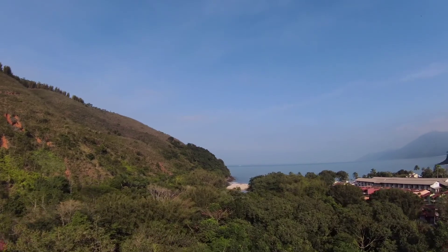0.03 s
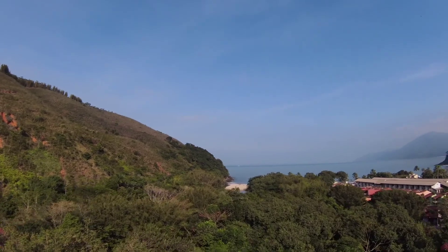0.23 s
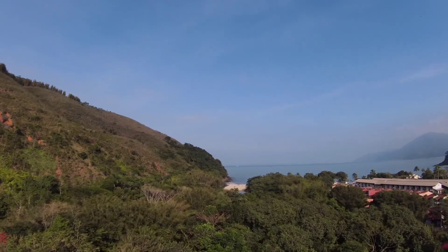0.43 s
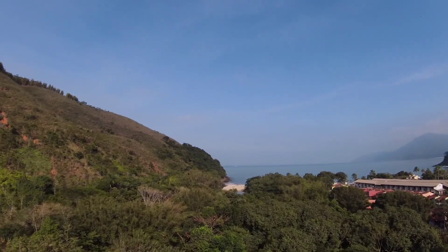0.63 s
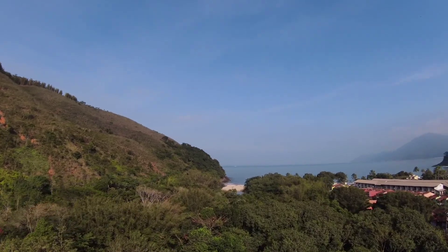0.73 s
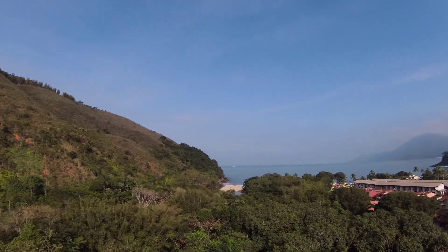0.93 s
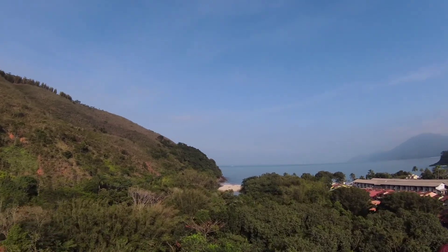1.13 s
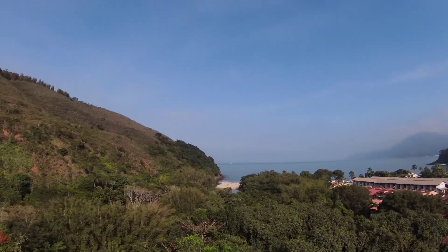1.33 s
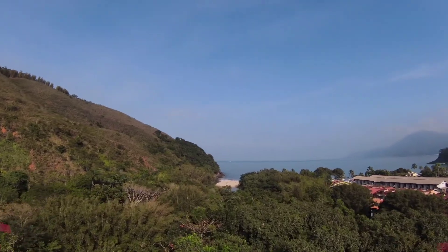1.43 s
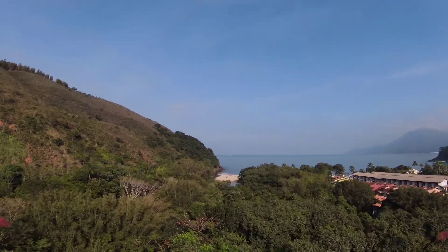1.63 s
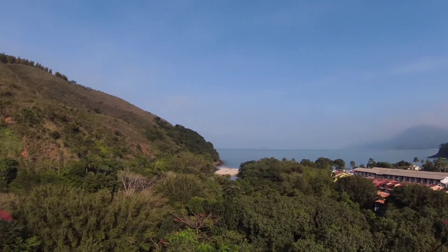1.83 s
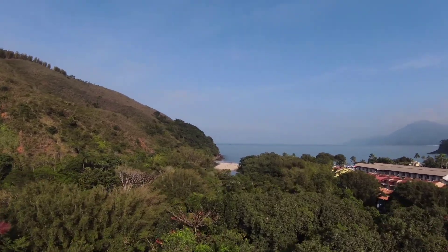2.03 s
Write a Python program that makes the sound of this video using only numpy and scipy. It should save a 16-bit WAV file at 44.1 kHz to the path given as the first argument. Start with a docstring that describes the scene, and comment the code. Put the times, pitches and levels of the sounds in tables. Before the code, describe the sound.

A small quadcopter drone flies outdoors, heard from on board: four propellers buzz continuously at slightly different pitches, beating together, with thin motor whine, rushing prop wash and low wind that grows slightly.

```python
"""Small quadcopter, heard from on board

Four three-blade propellers turn at slightly different speeds and beat: harmonics of each blade rate,
plus sum tones where rear blades cut the front wake. Motors whine at the magnet and coil-switching rates.
Prop wash is noise chopped at the blade rates, cut steeply near 3.9 kHz by the camera;
wind is low noise; the frame rings as gusty narrow-band noise."""
import sys
import numpy as np
from scipy import signal
from scipy.fft import rfft, irfft
from scipy.io import wavfile

SR = 44100
rng = np.random.default_rng(int(sys.argv[2]) if len(sys.argv) > 2 else 0)


def master_out(mix):
    """Clip the mix to full scale and print it as 16-bit PCM to the path in sys.argv[1]."""
    frames = np.transpose(np.atleast_2d(mix))
    ceiling = np.clip(frames, -1, 1)
    pcm = np.round(ceiling * 32767).astype(np.int16)
    wavfile.write(sys.argv[1], SR, pcm)


N = 92080

# Blade passing rate of each propeller: (time [s], rate [Hz])
FRONT_LEFT_HZ = [(0.0, 418.8), (0.15, 427.9), (0.35, 418), (0.55, 422.5), (0.7, 404.8), (0.77, 407.8),
                 (0.84, 410.2), (0.9, 416), (0.94, 414.7), (1.02, 409.3), (1.14, 411.6), (1.34, 408.6),
                 (1.42, 400.4), (1.58, 393.9), (1.69, 398), (1.8, 384.7), (1.96, 388.2), (2.08, 391)]
FRONT_RIGHT_HZ = [(0.0, 420.5), (0.23, 426), (0.492, 415.3), (0.598, 419.9), (0.708, 405.4), (0.89, 414.3),
                  (0.958, 411.9), (1.072, 405.8), (1.15, 405.6), (1.212, 405.1), (1.518, 403.7),
                  (2.08, 420.8)]
REAR_RIGHT_HZ = [(0, 532.7), (0.168, 537.8), (.62, 521.9), (.7, 518), (.83, 523), (0.949, 526),
                 (1.059, 517.6), (1.25, 517.2), (1.351, 517), (1.498, 511), (1.6, 504.4), (1.7, 511),
                 (1.799, 510), (1.9, 508), (2, 509.2), (2.08, 530)]
REAR_LEFT_HZ = [(0.0, 536.6), (0.21, 541.6), (0.498, 531.2), (0.61, 535.3), (0.712, 525), (0.78, 525),
                (0.901, 534.4), (1.399, 527.2), (1.5, 515), (1.868, 517.4), (1.99, 526), (2.08, 523.7)]
# Blade tones, rows front left, front right, rear right, rear left: (level of harmonics 1 to 6 [dB])
BLADE_DB = [(-44, -45.5, -47, -62.5, -64, -68), (-51.5, -54.5, -58, -62, -61.5, -57),
            (-53, -56, -68.5, -59.5, -67.5, -78), (-54, -48.5, -60.5, -69, -70.5, -76)]
# Placement and steadiness, same rows: (L-R [dB], lead at left microphone [ms], speed hunting [share])
ROTORS = [(-1, -.02, 0.003009), (-3.5, -0.24, .003), (-6, -0.26, .003), (4, 0.12, 0.0032)]
# Magnet whine of each motor, same rows: (level [dB], L-R [dB])
MAGNET_WHINE = [(-57.5, 7), (-60.5, 5.5), (-51.5, -9), (-53, -8)]
# Rear blades cutting the front wake: (front multiple [-], rear multiple [-])
WAKE_ORDERS = [(1, 1), (2, 1), (1, 2), (3, 2), (2, 4)]
# The same wake tones: (level [dB], L-R [dB])
WAKE_LEVELS = [(-51, 3), (-60, -6.5), (-60, 12), (-58, -2), (-59.5, -6)]
# Motor bell resonances: (centre [Hz], width [Hz], relative gain [dB])
BELL = [(5755, 170, -4), (7040, 47, 5.5)]
# Prop wash as the camera passes it, steep cut near 3.9 kHz, faint hiss above:
# (frequency [Hz], relative gain [dB])
WASH_AT_CAMERA = [(20, -30.5), (200, -4.5), (350, 0.5), (650, -0.5), (1000, 8), (1300, 4), (1700, 3),
                  (2050, 7), (2400, 6), (2700, -2), (3100, -3.5), (3500, -8), (3900, -21), (4300, -48),
                  (5000, -40.5), (6500, -28), (9000, -37), (15000, -34)]
# Wind spectrum: (frequency [Hz], relative level [dB])
WIND_SPECTRUM = [(12, -26), (28, -5), (48, -1.5), (80, -2.5), (135, -2.5), (200, -5.5), (300, -9),
                 (600, -19.5), (2000, -71.5)]

BLADES, POLES, COMMUTATIONS = 3, 14, 42  # per revolution
HUNT_PER_S = 39.36  # speed corrections
# Rough air on a tone at 1 kHz; higher tones feel more
FLUTTER_DB, FLUTTER_PER_S, ROUGH_SHARE = 2.0, 38, 0.12
EDDIES_PER_S = 140
LOAD_DB_PER_PERCENT = 0.39  # level per percent of speed, for a tone at 1 kHz
PORTS_APART_HZ = 1700  # above this the two microphones hear different sound
APART_RAD = 1.11  # phase offset of high tones at each microphone
MOTOR_EXPOSURE = 0.26  # motors feel rough air less than blades
SWITCH_DB, SWITCH_JITTER_RAD, SWITCH_JITTERS_PER_S = -92, 0.6, 160
WASH_DB, WASH_RISE_DB_PER_S = -42, 1.17  # levels with a rise hold at mid-scene
WASH_SIDE, WASH_CHOP_PER_ROTOR = 0.37, 0.165  # SIDE: stereo width in the bass, 0 to 1
WASH_SUCTION = 0.07  # eddies dip the pressure more than they raise it
WIND_DB, WIND_RISE_DB_PER_S, WIND_SIDE = -48, 1.5, 0.34
FRAME_HZ, FRAME_HALF_WIDTH_HZ, FRAME_SIDE = 1490, 44, 0.18
FRAME_DB, FRAME_RISE_DB_PER_S = -52.5, 3
FRAME_GUST_DB, FRAME_GUSTS_PER_S = 2, 11
TOP_HZ = 15500


def undb(db):
    """Decibels to amplitude gain."""
    return 10 ** (np.asarray(db) / 20)


def unit(x):
    """Scale to rms 1."""
    return x / np.sqrt(np.mean(x ** 2))


def walk(rate_per_s):
    """Smooth random motion, about rate_per_s turns a second, spread 1."""
    size = N // 32
    f_hz = np.fft.rfftfreq(size, N / size / SR)
    lowpass = 1 / (1 + (2 * f_hz / rate_per_s) ** 4)
    slow = unit(irfft(rfft(rng.standard_normal(size)) * lowpass, size))
    return signal.resample_poly(slow, 33, 1, window=("kaiser", 12))[:N]  # 33: enough to cover N


def air(colour, side):
    """Coloured stereo noise: partly shared by both sides in the bass, unrelated in the treble."""
    f_hz = np.fft.rfftfreq(N, 1 / SR)
    mid, difference = rfft(rng.standard_normal((2, N)))
    width = side + (1 - side) / (1 + (PORTS_APART_HZ / (f_hz + 1)) ** 8)
    signs = np.array([[1], [-1]])
    stereo = (mid + signs * width * difference) / np.sqrt(1 + width ** 2)
    return unit(irfft(colour(f_hz) * stereo, N))


def shape(points):
    """Gain against frequency, interpolated in dB over log frequency."""
    hz, db = np.array(points).T
    return lambda f_hz: undb(np.interp(np.log(f_hz + 1), np.log(hz), db))


def eddy():
    """Complex random motion: disturbs amplitude and phase of a tone."""
    return walk(EDDIES_PER_S) + 1j * walk(EDDIES_PER_S)


def tone(phase, db, pan_db=0, lead_ms=0, exposure=1):
    """One rotor line: level follows speed, rough air flutters it, high lines differ between microphones."""
    speed_hz = np.gradient(phase) * SR / (2 * np.pi)
    mean_hz = speed_hz.mean()
    exposed = exposure * 2 * mean_hz / (mean_hz + 1000)
    half_lead_rad = np.pi * mean_hz * lead_ms / 1000
    load_db = LOAD_DB_PER_PERCENT * exposed * (speed_hz / mean_hz - 1) * 100
    apart = 1 / (1 + (PORTS_APART_HZ / mean_hz) ** 4)
    shared_gust, shared_eddy = walk(FLUTTER_PER_S), eddy()
    out = []
    for side in (1, -1):  # left, right
        flutter = np.sqrt(1 - apart) * shared_gust + np.sqrt(apart) * walk(FLUTTER_PER_S)
        grain = 1 + ROUGH_SHARE * exposed * (shared_eddy + eddy()) / np.sqrt(2)
        side_phase = phase + side * (half_lead_rad + apart * APART_RAD)
        line = -np.real(grain * np.exp(1j * side_phase))  # minus: harmonics dip together
        moving = unit(undb(FLUTTER_DB * exposed * flutter + load_db) * line)
        out.append(moving * undb(db + side * pan_db / 2))
    return np.array(out)


def spin(curve, hunt_share, t):
    """Blade phase of one propeller: speed curve plus the flight controller's small corrections."""
    hz = np.interp(t, *np.array(curve).T) * (1 + hunt_share * walk(HUNT_PER_S))
    return 2 * np.pi * (rng.random() + np.cumsum(hz) / SR)


def propellers(phases):
    """Blade tones: harmonics of each blade passing rate."""
    out = np.zeros((2, N))
    for phase, levels_db, (pan_db, lead_ms, _) in zip(phases, BLADE_DB, ROTORS):
        for harmonic, db in enumerate(levels_db, 1):
            out += tone(harmonic * phase, db, pan_db, lead_ms)
    return out


def wake_cutting(phases):
    """Rear-left blades cut the front-right wake: sum tones of multiples of both blade rates."""
    _, front_right, _, rear_left = phases
    return sum(tone(front * front_right + rear * rear_left, db, pan_db)
               for (front, rear), (db, pan_db) in zip(WAKE_ORDERS, WAKE_LEVELS))


def magnet_whine(phases):
    """Magnets passing the stator: one tone per motor at the pole rate."""
    return sum(tone(phase * POLES / BLADES, db, pan_db, exposure=MOTOR_EXPOSURE)
               for phase, (db, pan_db) in zip(phases, MAGNET_WHINE))


def coil_switching(phases):
    """Faint uneven switching tones, swelling where they meet a motor bell resonance; mono."""
    switching = sum(np.cos(phase * COMMUTATIONS / BLADES + SWITCH_JITTER_RAD * walk(SWITCH_JITTERS_PER_S))
                    for phase in phases)
    f_hz = np.fft.rfftfreq(N, 1 / SR)
    bell = sum(undb(db) / (1 + 2j * (f_hz - hz) / width_hz) for hz, width_hz, db in BELL)
    return undb(SWITCH_DB) * unit(irfft(rfft(switching) * bell, N))


def wash(phases, late_s):
    """Turbulent air off the blades: noise pulsing at each blade rate, slowly thickening, cut by the camera."""
    chop = 1 + WASH_CHOP_PER_ROTOR * sum(np.cos(phase) for phase in phases)
    rush = air(lambda f_hz: f_hz / (f_hz + 100) / (1 + (f_hz / 3000) ** 2), WASH_SIDE) * chop
    rush = rush - WASH_SUCTION * (rush ** 2 - np.mean(rush ** 2))
    gain = shape(WASH_AT_CAMERA)(np.fft.rfftfreq(N, 1 / SR))
    return unit(irfft(rfft(rush) * gain, N)) * undb(WASH_DB + WASH_RISE_DB_PER_S * late_s)


def wind(late_s):
    """Wind rumble on the camera: low coloured noise, slowly growing."""
    return air(shape(WIND_SPECTRUM), WIND_SIDE) * undb(WIND_DB + WIND_RISE_DB_PER_S * late_s)


def frame_ring(late_s):
    """Wind shaking a frame resonance: narrow-band noise in gusts, slowly growing."""
    ring = air(lambda f_hz: 1 / (1 + ((f_hz - FRAME_HZ) / FRAME_HALF_WIDTH_HZ) ** 2), FRAME_SIDE)
    gusty = unit(ring * undb(FRAME_GUST_DB * walk(FRAME_GUSTS_PER_S)))
    return gusty * undb(FRAME_DB + FRAME_RISE_DB_PER_S * late_s)


def scene():
    """Four rotors and the air around them."""
    t = np.arange(N) / SR
    late_s = t - t.mean()
    curves = FRONT_LEFT_HZ, FRONT_RIGHT_HZ, REAR_RIGHT_HZ, REAR_LEFT_HZ
    phases = [spin(curve, hunt_share, t) for curve, (_, _, hunt_share) in zip(curves, ROTORS)]
    blades = propellers(phases) + wake_cutting(phases)
    motors = magnet_whine(phases) + coil_switching(phases)
    return blades + motors + wash(phases, late_s) + wind(late_s) + frame_ring(late_s)


def record(dry):
    """Camera low-pass: steep elliptic cut above TOP_HZ."""
    lowpass = signal.ellip(8, 0.2, 70, TOP_HZ, fs=SR, output="sos")  # ripple dB, stopband dB
    return signal.sosfilt(lowpass, dry)


dry = scene()
out = record(dry)
master_out(out)
```